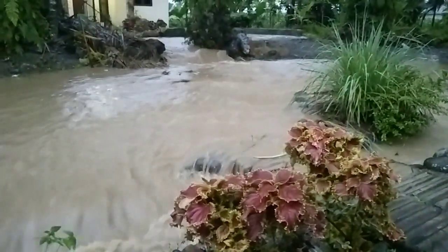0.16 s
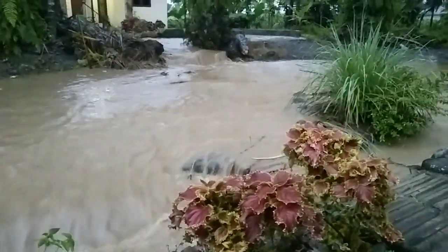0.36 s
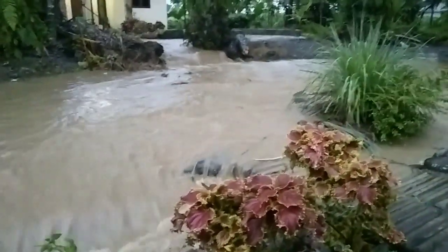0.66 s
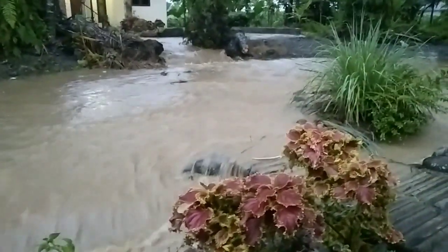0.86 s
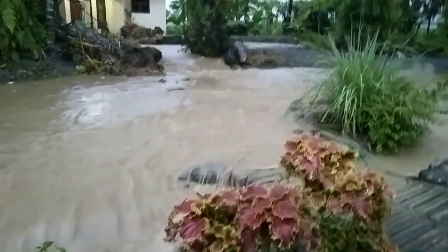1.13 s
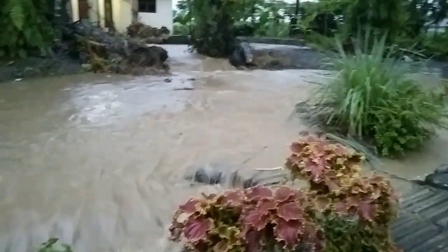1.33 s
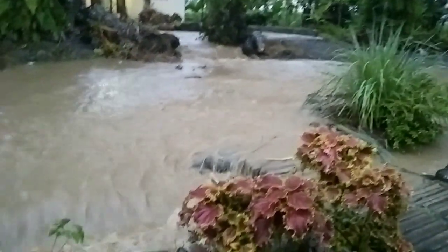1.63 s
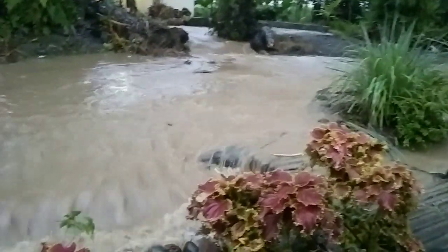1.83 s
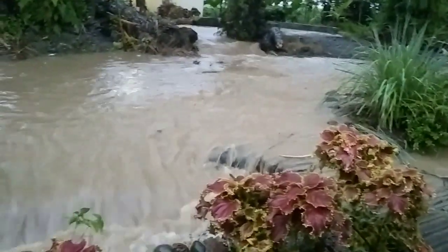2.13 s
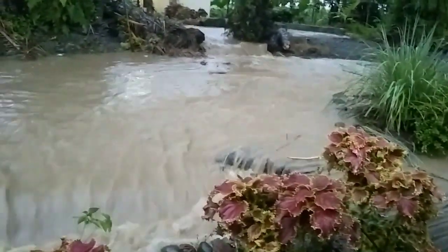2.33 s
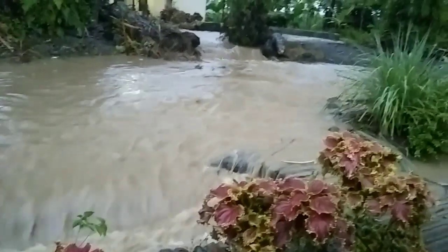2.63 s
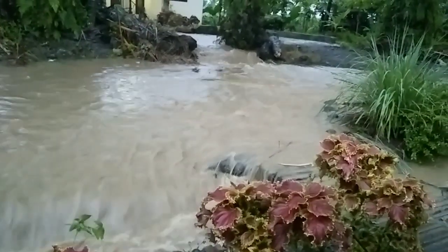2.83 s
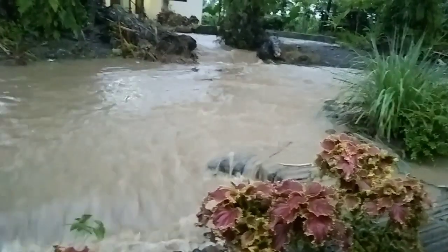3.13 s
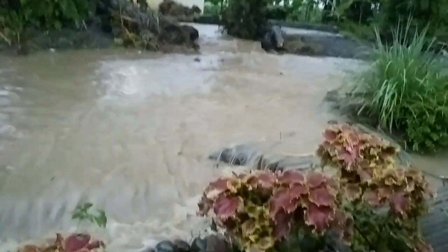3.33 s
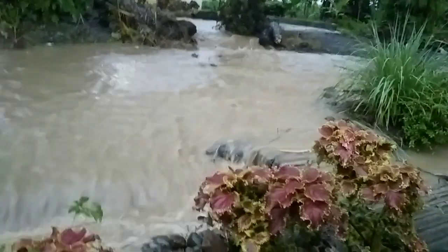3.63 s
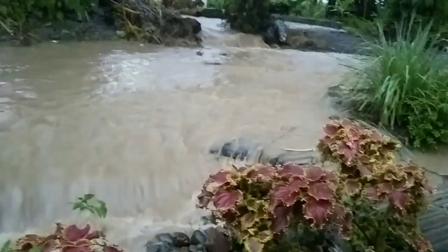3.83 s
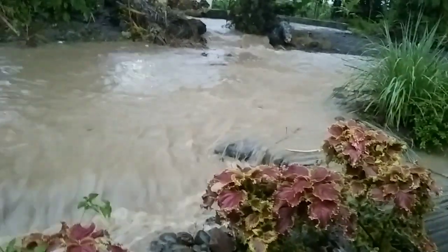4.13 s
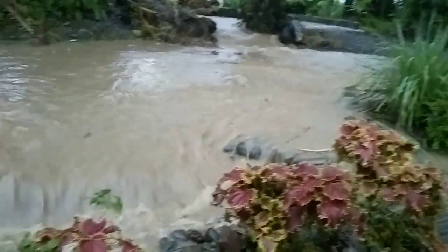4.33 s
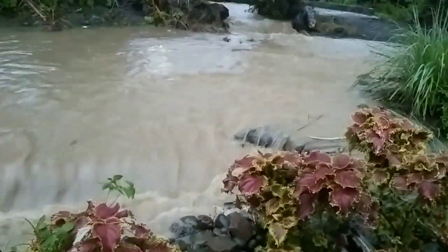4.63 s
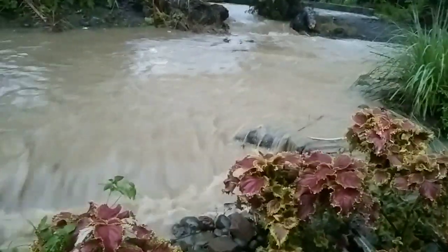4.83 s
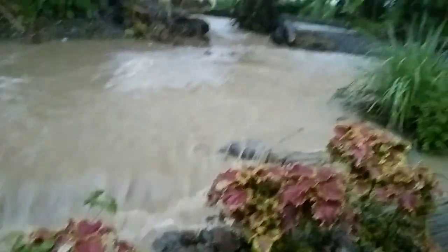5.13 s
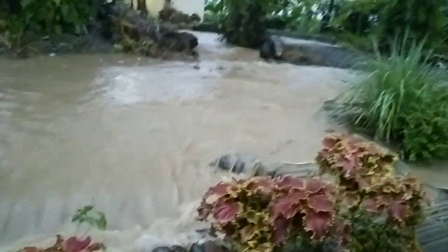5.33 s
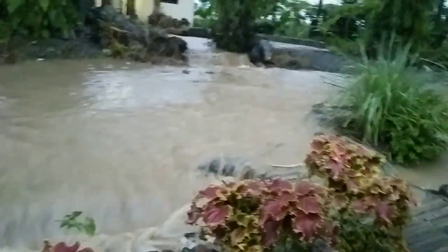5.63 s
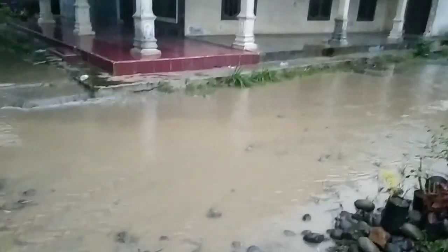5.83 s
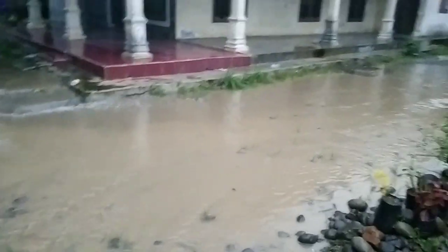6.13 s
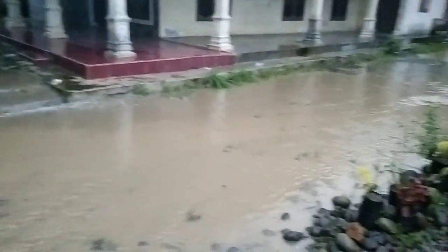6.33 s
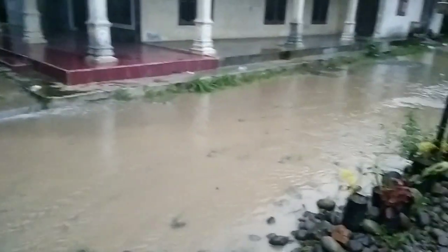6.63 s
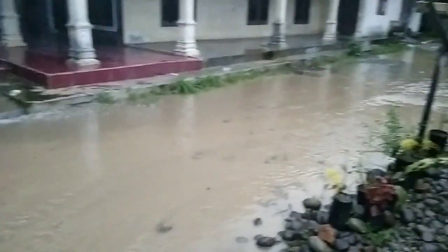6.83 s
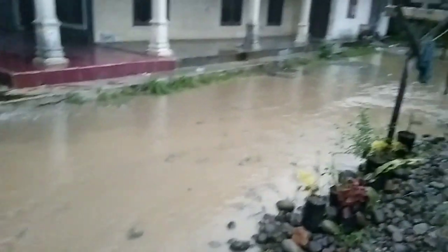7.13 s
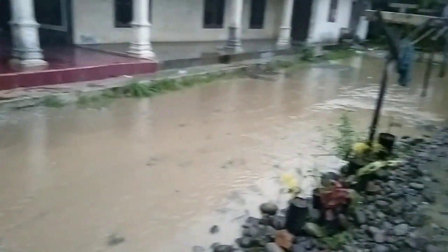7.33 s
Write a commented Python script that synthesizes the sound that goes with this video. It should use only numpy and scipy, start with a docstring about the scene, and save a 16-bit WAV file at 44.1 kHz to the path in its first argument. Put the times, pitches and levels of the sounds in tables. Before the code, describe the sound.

A full, hissing rush of water runs over rocks outdoors, its tone shifting slightly as the nearby phone microphone turns. Bubbles and droplets pop out of the flow. Near the end the sound drops at once to a faint wash in a flooded yard, with a broken, slightly garbled trickle, a few ringing drips and a far engine humming low and rising a little in pitch.

```python
"""Muddy floodwater pours over rocks in a ditch close to a hand-held phone: rushing noise and bubble froth,
with spectral dips that slide as the phone turns. Spray droplets and single bubbles ring out of the rush;
from 4.2 s water slaps rock. At 5.7 s the scene changes at once to a flooded yard: a faint wash, thin
bands of trickle chopped by the phone's noise suppressor, watery blips that it lets through, faint bubbles
and a far engine picking up speed. Drips ring from 6 s."""
import sys
import numpy as np
from scipy import signal
from scipy.fft import rfft, irfft, next_fast_len
from scipy.io import wavfile
from scipy.ndimage import minimum_filter1d, map_coordinates

SR = 44100
rng = np.random.default_rng(int(sys.argv[2]) if len(sys.argv) > 2 else 0)


def to_wav(s):
    """Save 16-bit WAV."""
    ch = np.atleast_2d(s).T  # columns
    pcm = np.round(np.clip(ch, -1, 1) * 32767)  # PCM
    wavfile.write(sys.argv[1], SR, pcm.astype(np.int16))


N = 329427
FRAME = 1024
CHANGE_S = 5.697

# Flood spectrum below the dips. Each row: frequency in Hz, relative density in dB.
BODY_SPECTRUM = [(22, -109), (43, -75.5), (108, -52.5), (172, -56.5), (237, -61), (430, -65), (540, -66.5),
                 (600, -74), (730, -83.5), (880, -66.5), (990, -65.5), (1120, -66.5), (1890, -66.5)]
# Dips and spray, one list per phone facing. Each row: frequency in Hz, relative density in dB.
DIP_SPECTRA = [
    [(2020, -69), (2330, -65), (2670, -79), (2840, -63), (2970, -78), (3060, -66), (3190, -84),
     (3270, -74.5), (3400, -93), (3800, -99.5), (4400, -88)],
    [(2020, -67), (2200, -87.5), (2330, -67), (2450, -92), (2630, -97), (2970, -85.5), (3100, -74),
     (3300, -89), (3500, -95), (4050, -93)],
    [(2020, -68.5), (2330, -69), (2450, -91), (2540, -84), (2670, -93.5), (2970, -81), (3100, -72.5),
     (3230, -94), (3530, -84)],
]
SPRAY_SPECTRA = [
    [(4740, -77.5), (5250, -81), (5800, -82), (6200, -76.5), (6800, -69.5), (7490, -70.5), (10510, -82),
     (12830, -96), (14130, -104), (15420, -103)],
    [(4300, -62), (4740, -74), (5250, -72), (6200, -74.5), (7670, -68), (8180, -75), (10420, -75),
     (12660, -83), (14470, -100), (15420, -102)],
    [(3700, -71), (3960, -67), (4520, -74), (5250, -72), (6290, -75.5), (7580, -76), (9220, -80.5),
     (10250, -88), (11710, -100), (12230, -99), (15420, -107)],
]
# Turn of the phone. Each row: time in seconds, facing from 0 to 2.
PHONE_FACING = [(0, 0.017), (1.5, 0.13), (2.6, 0.075), (3.0, 0.32), (3.4, 1.02), (3.75, 1.3), (3.95, 1.887),
                (5.7, 1.997)]
# Upper edge of the wide dip. Each row: facing, frequency in Hz.
DIP_EDGE = [(0, 4660), (1.05, 4560), (1.9, 3850), (1.99, 3650)]
# Flood swells. Each row: time in seconds, rumble gain in dB, rush gain in dB, spray over rush in dB.
FLOW_SWELLS = [(0, -39, -36, -1), (0.7, -38.5, -36, 1.1), (1.25, -41, -35.5, -0.5), (1.4, -39.5, -36, -0.1),
               (2.3, -38, -36, 0.7), (2.85, -41.5, -36, -0.5), (3.43, -38.5, -35, -3.5),
               (3.7, -41, -35.5, -0.9), (4.1, -38.5, -34.5, -1.5), (4.44, -38, -34, 0.1),
               (5.1, -40, -34.2, -2.5), (5.38, -37.5, -35.5, 2), (5.7, -44, -34.5, 3.2)]
# Two ringing bands of the rush. Each row: time in seconds, lower band gain in dB, upper band gain in dB.
RING_SWELLS = [(0, 1, 1.5), (1.9, 0, 0), (2.2, 3, -2), (2.85, 4.5, -1), (3.1, -1, 0.5), (5.1, 0.5, -0.5),
               (5.35, 1, 0.5), (5.7, -1, 3)]
RING_HZ, RING_WIDTH_HZ = [3050, 4000], [300, 280]
# Spray droplets. Each row: start in seconds, level in dB, pitch in Hz.
DROPLETS = [(0.578, -17, 6740), (0.7271, -23, 6970), (1.4715, -16, 8280), (1.8015, -8.5, 8250),
            (2.1321, -20, 6800), (2.752, -17, 6980), (2.7827, -10, 7200), (2.794, -22, 7670),
            (3.1808, -17.5, 6924), (3.3382, -15, 8200), (4.2143, -14, 6800), (5.3273, -20.5, 6500),
            (5.448, -17, 7640), (5.517, -13.5, 7440)]
# Single bubbles. Each row: start in seconds, level in dB, pitch in Hz, cycles to fade 20 dB.
SINGLE_BUBBLES = [(0.886, -25, 1230, 14), (2.394, -22, 334, 5), (2.5, -32, 3700, 30),
                  (2.508, -20.5, 2570, 25), (3.0927, -17.5, 1780, 20), (3.5065, -21, 1580, 16),
                  (3.794, -19, 1340, 6), (3.9062, -23, 980, 7), (4.015, -17, 1200, 7),
                  (4.1448, -15, 1620, 12), (4.2078, -21, 1740, 10), (4.22, -16, 760, 3.5),
                  (4.413, -21, 263, 3.5), (4.689, -26, 283, 4.5), (4.7596, -20, 1560, 8),
                  (4.9284, -23, 1750, 7), (5.295, -21, 331, 2.5), (5.5072, -16, 4000, 19),
                  (5.661, -18, 3830, 14), (5.684, -15, 3970, 14), (5.822, -40, 1260, 30),
                  (5.979, -42, 1520, 20), (6.01, -44, 1230, 22), (6.15, -36, 1590, 24),
                  (6.231, -39, 670, 18), (6.26, -37, 1480, 20), (6.2, -44, 620, 20), (6.268, -44, 640, 14),
                  (6.302, -39, 627, 13), (6.329, -42, 412, 11), (6.411, -43, 1140, 23),
                  (6.508, -44, 1463, 27), (6.64, -42, 1120, 15), (6.762, -45, 1300, 20),
                  (6.775, -44, 1050, 20), (6.81, -43, 1050, 20), (6.897, -46, 1060, 22),
                  (6.862, -41, 606, 10), (7.07, -41, 1220, 22)]
# Water on rock. Each row: start in seconds, level in dB, time constant in seconds.
ROCK_SLAPS = [(4.209, -11.5, 0.00019), (4.2215, -22, 0.00027), (5.354, -22, 0.00054),
              (5.3692, -15.5, 0.0004), (5.3836, -17, 0.00036)]
# Yard wash. Each row: frequency in Hz, relative density in dB.
WASH_SPECTRUM = [(200, -6.5), (330, -14.5), (800, -21.5), (1500, -22.5), (2100, -14.5), (4000, -29),
                 (5300, -20), (6600, -24.5), (7900, -39), (9500, -34), (10400, -43), (11500, -21),
                 (12700, -22), (15500, -29)]
# Trickle, one list per band. Each row: time in seconds, centre in Hz, relative level in dB.
TRICKLE_BANDS = [
    [(5.7, 2060, -45), (5.95, 2070, -43.5), (6.3, 1830, -50), (6.7, 1910, -53), (7.15, 2150, -52),
     (7.35, 2290, -43), (7.47, 2260, -54)],
    [(5.7, 3550, -38.5), (6.05, 3650, -52), (6.35, 3000, -64), (6.65, 3340, -75), (7.05, 3600, -55.5),
     (7.47, 3230, -60)],
    [(5.7, 4800, -43.5), (5.85, 4830, -46), (6.2, 5280, -49), (6.35, 5360, -44.5), (6.6, 5230, -48),
     (7.0, 5240, -45.5), (7.47, 5230, -46.5)],
    [(5.7, 7950, -58), (5.91, 7850, -59), (5.97, 7700, -46.5), (6.24, 7760, -43.5), (6.5, 7930, -45),
     (6.65, 8100, -50), (6.83, 7780, -48), (7.1, 8050, -49.5), (7.47, 7600, -55.5)],
]
# Half-width of each trickle band in Hz.
TRICKLE_HALF_WIDTH_HZ = [242, 416, 740, 670]
# Noise suppressor blips. Each row: frequency in Hz, relative density in dB.
BLIP_SPECTRUM = [(250, -28), (370, -8), (650, 0), (950, -10.5), (1150, 1), (1600, -5), (2800, -1.5),
                 (4000, -10.5), (6000, -4.5), (6700, -37), (8900, -2.5), (9800, -16.5), (11300, -15),
                 (12000, -35)]
# Swell of the low blips. Each row: time in seconds, gain in dB.
BLIP_SWELLS = [(5.7, -1), (6.1, 2.5), (6.35, 4.5), (6.7, -1), (7.0, -3), (7.47, -6)]
# Engine overtones. Each row: multiple of the firing rate, base level in dB, growth in dB per second.
ENGINE_OVERTONES = [(2, -57.5, 6.5), (3, -59.5, 6), (4, -42, -1), (5, -40.5, 0), (6, -48.5, -4),
                    (7, -56.5, -5), (8, -58.5, -4.5)]
# Swells of overtones 4 and up. Each row: time in seconds, gain in dB, lean of 5 and up over 4 in dB.
ENGINE_SWELLS = [(5.7, 2.5, -3), (5.95, 0, 2), (6.08, 4, 2), (6.4, -0.5, 10), (6.51, -1.5, -4),
                 (6.7, 0.5, 0), (6.75, -7, -1), (6.97, -8, -2), (7.25, 0, -3), (7.47, -1, -4)]
# Exhaust rumble. Each row: frequency in Hz, relative density in dB.
EXHAUST_SPECTRUM = [(20, -10), (35, -1), (60, -3), (130, -3), (200, -16), (270, -17.5), (400, -64)]
# Yard drips. Each row: start in seconds, level in dB, pitch in Hz.
DRIPS = [(6.073, -32, 7760), (6.1858, -35, 7870), (6.2401, -26, 7700), (6.287, -34, 7600),
         (6.322, -35, 7970), (6.3459, -31, 7700), (6.4806, -33, 7560), (6.5699, -31, 8050),
         (6.8143, -26.5, 7800), (6.8727, -29, 7750), (7.27, -33, 7600)]


def amp(db):
    """Decibels to gain."""
    return 10 ** (np.asarray(db) / 20)


def unit(x):
    """Scale to rms 1."""
    return x / np.sqrt(np.mean(x ** 2) + 1e-20)


def along(points, hz):
    """Interpolate (Hz, value) points on a log axis."""
    f, v = np.transpose(points)
    return np.interp(np.log(hz + 1), np.log(f + 1), v)


def curves(rows, at):
    """Interpolate the other columns against the first."""
    knots, *columns = np.transpose(rows)
    return [np.interp(at, knots, column) for column in columns]


def stft(x):
    """Frequencies (column), times, short-time spectrum."""
    hz, t, z = signal.stft(x, SR, nperseg=FRAME, noverlap=FRAME * 3 // 4)
    return hz[:, None], t, z


def istft(z):
    """Short-time spectrum to samples."""
    return signal.istft(z, SR, nperseg=FRAME, noverlap=FRAME * 3 // 4)[1][:N]


def wander(t, pace_s):
    """Smooth random curve, one knot every pace_s."""
    return map_coordinates(rng.standard_normal(400), [t / pace_s % 399], order=3)


def blobs(shape, wide_hz, long_s):
    """Smooth random field over frequency and time, rms 1."""
    knots = rng.standard_normal((200, 500))
    f = np.linspace(0, shape[0] * SR / FRAME / wide_hz, shape[0]) % 199
    t = np.linspace(0, shape[1] * FRAME / 4 / SR / long_s, shape[1]) % 499
    rows = knots[f.astype(int)] * (1 - f % 1)[:, None] + knots[f.astype(int) + 1] * (f % 1)[:, None]
    return unit(rows[:, t.astype(int)] * (1 - t % 1) + rows[:, t.astype(int) + 1] * (t % 1))


def flicker(shape, wide_hz, long_s, rare, soft):
    """Blobs gated on and off; higher rare, fewer on."""
    return 1 / (1 + np.exp((rare - blobs(shape, wide_hz, long_s)) / soft))


def patches(shape, wide_hz, long_s, depth_db):
    """Random gain in blobs, mean power near 1."""
    return amp(depth_db * blobs(shape, wide_hz, long_s) - depth_db ** 2 * np.log(10) / 20)


def pings(start_s, db, hz, cycles, rise, size=FRAME, attack=7.9):
    """Damped sines with a soft start; pitch rises as a bubble nears the surface."""
    start_s, db, hz, cycles = (np.reshape(v, (-1, 1)) for v in (start_s, db, hz, cycles))
    k = np.arange(size)
    turns = hz * k / SR
    age = turns / cycles
    envelope = (1 - np.exp(-(attack * age) ** 2)) * amp(db - 20 * age)
    waves = envelope * np.sin(2 * np.pi * turns * (1 + rise * age))
    index = np.round(start_s * SR).astype(int) + k
    return np.bincount(index.ravel(), waves.ravel(), N + SR)[:N]


def froth(count=4000):
    """Dense bed of bursting bubbles; small ones ring more cycles."""
    when, pitch, strength = rng.random((count, 3)).T
    hz = 700 * amp(23 * pitch)
    db = 12 * np.log10(hz) + 13 * strength ** 2
    return unit(pings(when * CHANGE_S, db, hz, cycles=6.2 + hz / 400, rise=0.059, size=FRAME // 2))


def facing_colour_db(hz, t):
    """Flood spectrum as the phone turns; spray takes over above the wide dip's sliding edge."""
    facing, = curves(PHONE_FACING, t)
    edge_hz, = curves(DIP_EDGE, facing)
    shares = [np.clip(1 - abs(facing - k), 0, 1) for k in range(3)]
    below_db = sum(w * along(BODY_SPECTRUM + dips, hz) for w, dips in zip(shares, DIP_SPECTRA))
    above_db = sum(w * along(spray, hz) for w, spray in zip(shares, SPRAY_SPECTRA))
    return below_db + (above_db - below_db) / (1 + np.exp(np.clip((edge_hz - hz) / 35, -50, 50)))


def dip_fill_db(hz, colour_db):
    """Dips fill and empty at random; blips flicker in the wide one as the noise suppressor opens."""
    narrow_depth_db = -minimum_filter1d(-colour_db, size=11, axis=0) - colour_db
    wide_depth_db = -minimum_filter1d(-colour_db, size=45, axis=0) - colour_db
    fill_db = 1.14 * narrow_depth_db * (flicker(colour_db.shape, 118.7, .05, rare=0.95, soft=0.15) - .3)
    blip_db = 0.62 * wide_depth_db * flicker(colour_db.shape, 130.2, .05, rare=1.37, soft=0.2)
    return fill_db * (hz > 520) + blip_db * (hz > 3300) * (hz < 4800)


def flood():
    """Water over rocks: coloured noise and froth, swelling and surging by band."""
    hz, t, z = stft(rng.standard_normal(N) + amp(-12) * froth())
    colour_db = facing_colour_db(hz, t)
    water = unit(istft(z * amp(colour_db + dip_fill_db(hz, colour_db))))
    low = 1 / (1 + (hz / 600) ** 4)
    high = 1 / (1 + (3500 / (hz + 1)) ** 4)
    rumble_db, rush_db, spray_db = curves(FLOW_SWELLS, t)
    heave_db = .7 * wander(t, pace_s=.1)
    swell_db = low * (rumble_db + heave_db) + (1 - low) * rush_db + high * spray_db
    for ring_db, centre_hz, width_hz in zip(curves(RING_SWELLS, t), RING_HZ, RING_WIDTH_HZ):
        swell_db += ring_db * np.exp(-((hz - centre_hz) / width_hz) ** 2)
    surge = patches(z.shape, 5300, .02, depth_db=.5 + 0.29 * high)
    surge *= patches(z.shape, 149.6, .045, depth_db=1 + 2.6 * np.exp(-((hz - 2950) / 400) ** 2))
    surge *= patches(z.shape, 109.9, .14, depth_db=0.61 + high)
    return amp(5.5) * istft(stft(water)[2] * amp(swell_db) * surge)


def droplets():
    """Spray droplets: short high pings."""
    return pings(*np.transpose(DROPLETS), cycles=7.5, rise=0.013)


def bubbles():
    """Single ringing bubbles, loud in the ditch, faint in the yard."""
    return -pings(*np.transpose(SINGLE_BUBBLES), rise=0.012, size=FRAME * 2, attack=5.1)


def slaps():
    """Water slaps rock: a sharp pull of pressure, then a longer rebound."""
    out, t = np.zeros(N), np.arange(FRAME) / SR
    for start_s, db, pull_s in ROCK_SLAPS:
        u = t / pull_s
        out[round(start_s * SR):][:FRAME] -= amp(db) * 3.1 * u * u * (1 - u / 3) * np.exp(-u)
    return out


def wash():
    """Faint steady noise of the flooded yard."""
    hz, _, z = stft(rng.standard_normal(N))
    return amp(-54.5) * unit(istft(z * amp(along(WASH_SPECTRUM, hz))))


def trickle(spurt_db=2.5):
    """Four drifting bands of trickle, chopped on and off by the phone's noise suppressor."""
    hz, t, z = stft(rng.standard_normal(N))
    bands = 0
    for rows, width_hz in zip(TRICKLE_BANDS, TRICKLE_HALF_WIDTH_HZ):
        centre_hz, db = curves(rows, t)
        band = np.exp(-((hz - centre_hz) / width_hz) ** 4) * np.sqrt(SR / 4 / width_hz)
        bands += amp(db + spurt_db * wander(t, pace_s=.06)) * band
    gate = 0.11 + flicker(z.shape, 89.94, .036, rare=0.23, soft=0.16)
    return amp(2) * istft(z * bands * gate)


def suppressor_blips():
    """Sparse watery blips of faint yard noise let through by the noise suppressor, as a random gate."""
    hz, t, z = stft(rng.standard_normal(N))
    swell_db, = curves(BLIP_SWELLS, t)
    colour_db = along(BLIP_SPECTRUM, hz) + swell_db * (hz < 1700)
    gate = flicker(z.shape, 100, .03, rare=1.34, soft=0.11)
    return amp(-55) * unit(istft(z * amp(colour_db) * gate))


def engine(firing_hz=25.3, climb_hz_per_s=3.1, waver_db=2.5):
    """Far engine: unsteady overtones of a climbing firing rate; the exhaust throbs once a firing."""
    t = np.arange(N) / SR
    since_s = t - CHANGE_S
    firings = firing_hz * since_s + climb_hz_per_s * since_s ** 2 / 2
    swell_db, lean_db = curves(ENGINE_SWELLS, t)
    overtones = 0
    for k, base_db, growth_db_per_s in ENGINE_OVERTONES:
        db = base_db + growth_db_per_s * np.maximum(since_s, 0)
        if k > 3:
            db += swell_db + lean_db * min(k - 4.5, .5)
        db += waver_db * np.sqrt(k / 5) * wander(t, pace_s=.09)
        phase_rad = 2 * np.pi * (k * firings + rng.random()) + 0.1 * k * wander(t, pace_s=.045)
        overtones += amp(db) * np.sqrt(2) * np.sin(phase_rad)
    size = next_fast_len(N)
    exhaust_db = along(EXHAUST_SPECTRUM, np.fft.rfftfreq(size, 1 / SR))
    exhaust = irfft(rfft(rng.standard_normal(size)) * amp(exhaust_db), size)[:N]
    throb = 1 + 0.21 * np.sin(2 * np.pi * firings)
    return overtones + amp(-46.5) * unit(exhaust) * throb


def drips():
    """Drips in the yard: high ringing ticks."""
    return pings(*np.transpose(DRIPS), cycles=40, rise=.003)


def scene(crossfade_s=0.0041):
    """Ditch, then yard; bubbles in both."""
    ditch = flood() + droplets() + slaps()
    yard = wash() + trickle() + suppressor_blips() + engine() + drips()
    yard_share = np.clip((np.arange(N) / SR - CHANGE_S) / crossfade_s + .5, 0, 1)
    return ((1 - yard_share) * ditch + yard_share * yard + bubbles())[None]


def record(dry, low_cut_hz=59.3, top_hz=15600):
    """Phone microphone: bass roll-off, hard upper band limit."""
    size = next_fast_len(N + SR // 2)
    hz = np.fft.rfftfreq(size, 1 / SR)
    response = (hz < top_hz) / np.sqrt(1 + (low_cut_hz / (hz + 1)) ** 3)
    return irfft(rfft(dry, size) * response, size)[:, :N]


dry = scene()
out = record(dry)
to_wav(out)
```